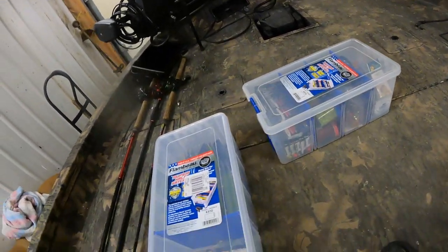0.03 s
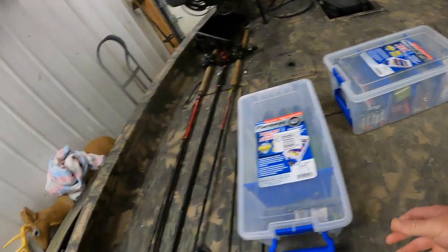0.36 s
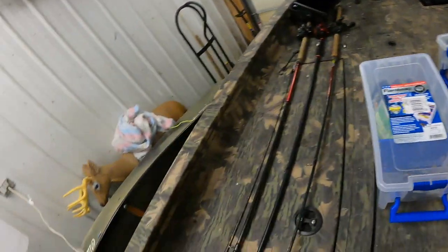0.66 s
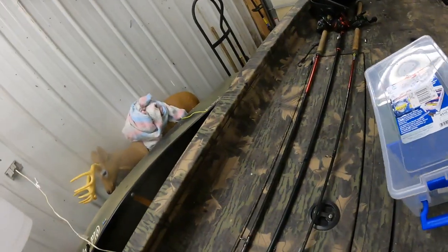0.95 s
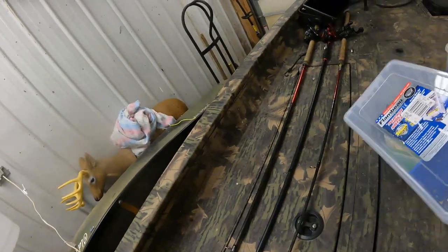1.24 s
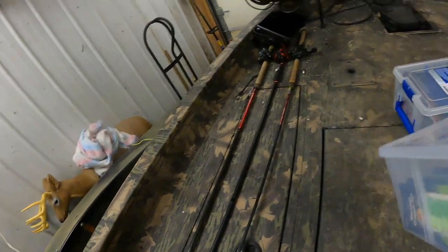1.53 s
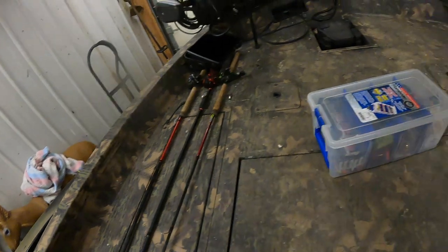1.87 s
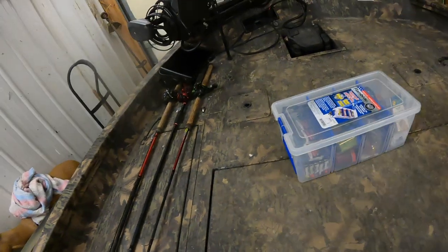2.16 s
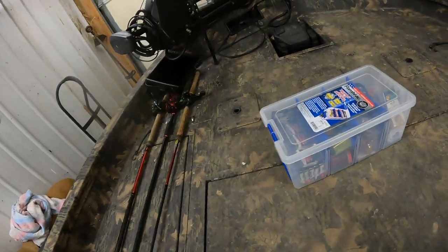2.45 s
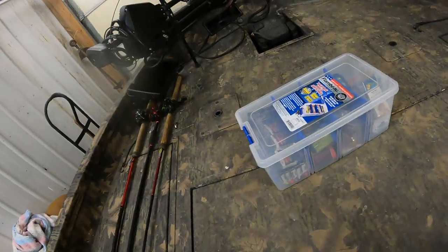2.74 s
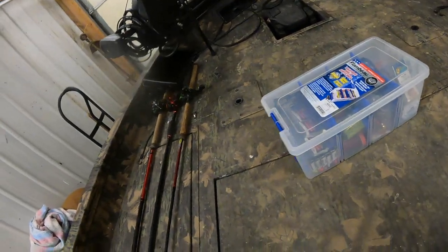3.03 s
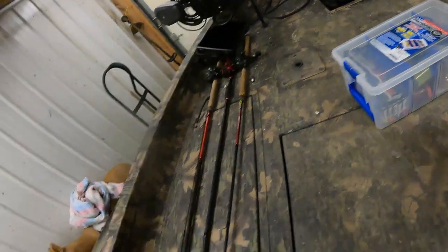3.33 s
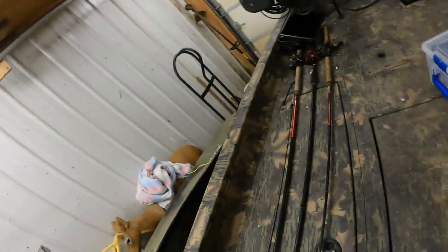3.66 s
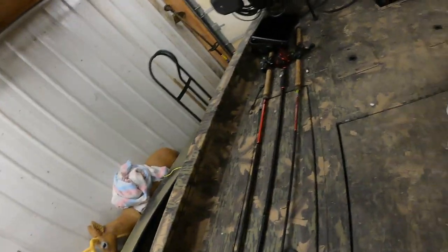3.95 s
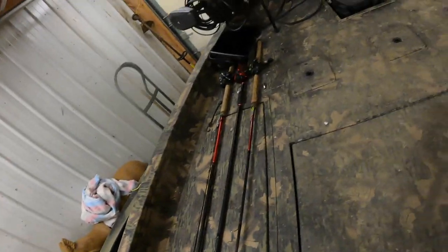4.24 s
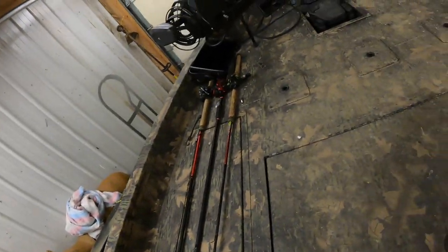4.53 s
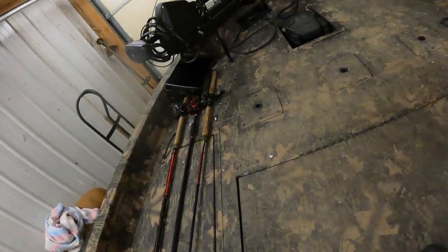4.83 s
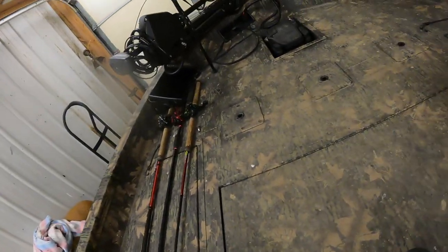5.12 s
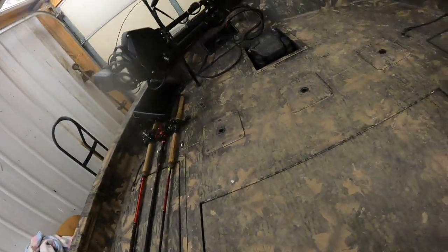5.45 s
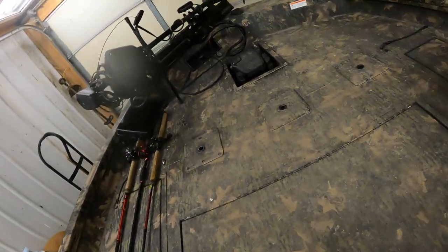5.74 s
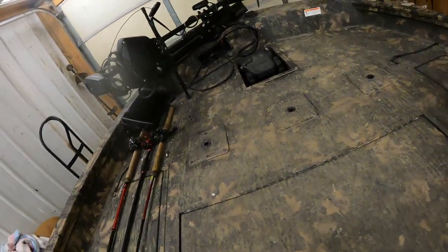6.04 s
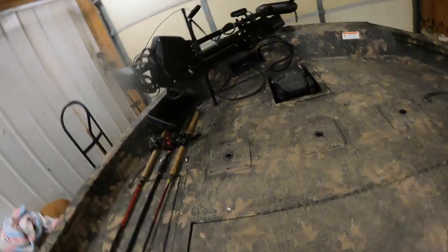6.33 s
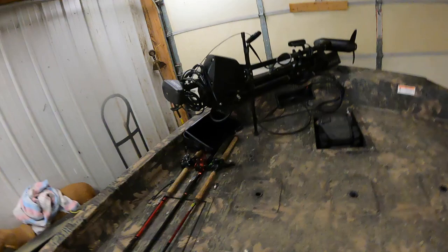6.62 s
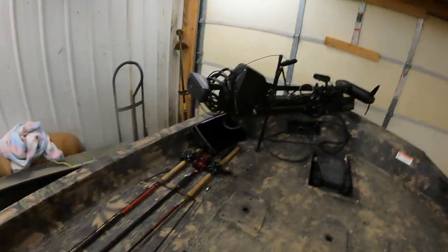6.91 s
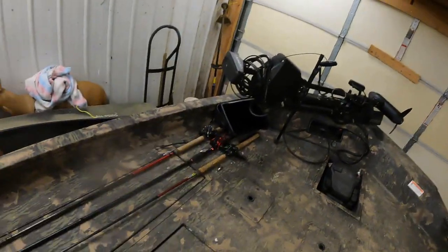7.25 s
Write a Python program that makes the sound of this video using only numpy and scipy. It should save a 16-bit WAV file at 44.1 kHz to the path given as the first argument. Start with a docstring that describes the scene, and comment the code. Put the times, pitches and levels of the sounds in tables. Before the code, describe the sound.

A plastic tackle box lands with a hollow thud on a carpeted boat deck in a garage. Handles snap, a box judders as it is pulled free, and another thud shakes the lures inside. A box is then dragged over the carpet with several knocks, followed by three more rattling thuds. Near the end come dull bumps, small creaks and sleeve rustle close to the microphone. The walls add a short echo.

```python
"""A plastic tackle box lands with a hollow thud on a carpeted boat deck in a garage. Boxes are set down,
lifted and dragged: each knock thuds in the deck, rings the box and shakes the lures inside, and the
walls throw it back. Handles snap; box bottoms judder and scrape over the carpet. Sleeves rustle near
the stereo microphone, and towards the end come small pops, dull hollow bumps and creaks close by."""
import sys
import numpy as np
from scipy import signal
from scipy.fft import rfft, irfft, next_fast_len
from scipy.io import wavfile

SR = 44100
rng = np.random.default_rng(int(sys.argv[2]) if len(sys.argv) > 2 else 0)


def transcribe(u):
    """Save the signal u as a 16-bit wav file named by the first command-line argument.

    u: samples, shape (n,) or (channels, n), limited to [-1, 1]; the rate is SR.
    q: integer samples, one column per channel.
    """
    v = np.clip(np.atleast_2d(u).T, -1, 1)
    q = np.round(v * 32767).astype(np.int16)
    wavfile.write(sys.argv[1], SR, q)


N = 329864
TIME = np.arange(N) / SR

# modes of a box standing on the deck: (frequency [Hz], level [dB], base t60 [s])
BOX_MODES = [(49.5, -15.5, 0.37), (81, -6, 0.25), (135.15, -2.5, 0.41), (161.7, -0.5, 0.33),
             (211, -6.5, 0.28), (246, 6, 0.12), (294.4, -2.5, 0.15), (388.1, -0.5, 0.13), (484, -16, 0.4),
             (604, -7, 0.029), (709.5, -5.5, 0.068), (745, -7.5, 0.08), (952, -6, 0.12), (1040, -18, 0.12),
             (1220, -9.5, 0.1), (1700, -21, 0.03), (2790, -24, 0.1), (3340, -36, 0.15), (3770, -35, 0.068)]
# thud, body, clack and tick bands: (low edge [Hz], high edge [Hz], base t60 of dense ring [s], weight [dB])
BANDS = [(33.2, 110.7, 0.078, 2), (184, 491, 0.046, 1), (462, 1790, 0.1, -6), (2470, 43000, 0.21, -1)]


def landings():
    """A box bottom booms on the deck, its lid slaps a moment later, and walls and deck ring on."""
    # (time [s], force [dB], thud [dB], tick [dB], lid delay [s], lure rattle [dB], boom [dB],
    #  boom note [Hz], lid note [Hz], wall hum [dB], hum note [Hz])
    drops = [(0.001, -4.5, -21.5, -31.5, 0.012, -17, -15.5, 265, 1100, -24, 383),
             (2.441, -3.5, -23.5, -29.5, 0.0077, -2.5, -17, 191, 840, -28, 244),
             (2.537, -5.5, -24.5, -31, 0.0068, -25, -12.5, 250.5, 1030, -19, 249),
             (5.198, -2.5, -29, -23, 0.0052, -2, -7.5, 258, 1070, -21, 388),
             (5.37, -5, -25.5, -29, .005, -2, -13, 201, 1110, -29, 388),
             (5.514, -7.5, -24.5, -30, 0.0045, -14, -11, 239, 1140, -28, 236)]
    # the deck sways under a settled box: (time [s], note [Hz], level [dB])
    sways = [(0.164, 63, -33), (2.648, 69.6, -25), (5.576, 80, -27), (5.98, 80, -38)]
    out = np.zeros((2, N))
    for s, force, thud, tick, lid_s, rattle_db, boom_db, boom_hz, lid_hz, hum_db, hum_hz in drops:
        bottom = (thud, force - 12.5, force - 11, tick)
        lid = (thud + 5.5, force - 18, force - 12, tick - 2)
        add(out, s, box_strike(bottom, wall_hz=670, rattle_db=rattle_db))
        add(out, s, boom(boom_hz, boom_db, rise_s=0.0095))
        add(out, s + lid_s, box_strike(lid, lid_hz, rattle_db))
        add(out, s + lid_s, wall_hum(hum_hz, hum_db))
    for s, hz, db in sways:
        add(out, s, boom(hz, db, rise_s=0.039))
    return out


def knocks():
    """Boxes rock and bump on one edge with single blows, some hard and some dull."""
    # (time [s], clack [dB], deck thud [dB], box body [dB], tick [dB], wall note [Hz], bottom note [Hz])
    bumps = [(0.029, -19, -21, -17, -54, 720, 64.5), (0.047, -25, -23, -23.5, -36.5, 720, 115),
             (0.072, -23, -29, -14, -40, 740, 240), (0.096, -25, -26, -24, -41, 1050, 260),
             (0.142, -28.5, -23.5, -36, -41.5, 990, 180), (0.807, -37, -38, -41, -50.5, 1050, 174),
             (1.326, -30, -40, -20, -38.5, 680, 200), (1.354, -34, -41, -21, -47, 1050, 185),
             (2.602, -22.5, -18.5, -22, -43, 1070, 258), (2.627, -26, -21.5, -21.5, -36, 600, 249),
             (2.766, -35, -25, -34.5, -48, 1610, 294), (2.832, -25.5, -31, -26, -41, 1620, 256),
             (2.987, -39, -29, -27.5, -49, 990, 171), (3.018, -42, -38.5, -37, -51, 710, 240),
             (3.823, -44, -27, -28, -51, 710, 131), (3.904, -15.5, -20, -16, -33, 775, 187),
             (4.089, -29, -15.5, -22.5, -42, 890, 140), (4.15, -12.5, -32, -23, -48, 1140, 253),
             (4.207, -17, -16, -15.5, -46, 580, 255), (4.322, -17, -17.5, -18.5, -46, 715, 204),
             (4.388, -20.5, -24.5, -31, -37, 1350, 283), (4.405, -24, -26, -29, -55, 860, 265),
             (4.547, -24, -41, -23.5, -44, 1000, 342), (4.731, -23, -48, -28.5, -37.5, 653, 150),
             (5.243, -29, -36, -25, -47, 1250, 280), (5.277, -26, -40, -25.5, -50, 930, 168),
             (5.425, -20, -36, -22, -36, 1140, 181), (5.447, -20.5, -55, -29, -47, 730, 365),
             (5.712, -35.5, -34, -34.5, -60, 735, 133), (5.76, -38.5, -33, -35, -55, 590, 165),
             (5.827, -40, -38.5, -43, -52, 600, 140), (5.878, -33, -44, -37, -53, 640, 213),
             (5.89, -27, -29.5, -32, -42.5, 1400, 229), (5.935, -31.5, -29.5, -29.5, -39.5, 1800, 201)]
    out = np.zeros((2, N))
    for s, clack, thud, body, tick, wall_hz, bottom_hz in bumps:
        add(out, s, box_strike((thud, body - 3.5, clack, tick), wall_hz, rattle_db=-27.5))
        add(out, s, boom(bottom_hz, body + 1.5, rise_s=0.0084))
    return out


def box_strike(levels_db, wall_hz, rattle_db):
    """One blow on a box, almost centred on the microphone; the struck wall adds its own hollow note."""
    modes = list(BOX_MODES) + [(wall_hz, 1.5, 0.035)]
    sound = blow(modes, levels_db, hold=0.99, rattle_db=rattle_db,
                 dense_db=(0.5, 2.1, 7.2, 9.5), crack_db=3, detune=0.017)
    return amp(0.5) * sound * pan(-0.7)


def blow(modes, levels_db, hold, rattle_db, dense_db, crack_db, detune):
    """Clear modes over a crack, a dense ring and a trailing rattle, levelled per band."""
    # spectrum of ringing plastic: (frequency [Hz], level [dB])
    plastic = [(18, -88), (30, 7.5), (65, 1), (180, -14), (240, -12.5), (337, -19.5), (384, -8.5),
               (426, -28.5), (538, -18.5), (837, -28), (1030, -20), (1370, -25.5), (6200, -39),
               (11900, -62.5), (15000, -78)]
    t = np.arange(SR // 2) / SR
    clear = ring(modes, t, detune, hold)
    hiss = colour(stereo_noise(len(t)), plastic)
    crack = amp(crack_db) * np.exp(-t / 0.0007)
    rattle = amp(rattle_db) * unit(amp(2.2 * wander(len(t), 464))) * np.exp(-t / 0.057)
    contact = 1 - np.exp(-t / 0.00012)
    burst_gain = np.sqrt(0.013 / t[-1])  # the energy of a 13 ms burst at unit rms
    out = np.zeros((2, len(t)))
    for (lo, hi, t60, weight_db), db, share_db in zip(BANDS, levels_db, dense_db):
        envelope = crack + decay(t, t60 * hold) + rattle
        dense = amp(share_db) * unit(band(hiss * envelope * contact, lo, hi))
        out += amp(db + weight_db) * burst_gain * unit(unit(band(clear, lo, hi)) + dense)
    return out * np.minimum(1, (t[-1] - t) * 10)


def boom(hz, db, rise_s, sharpness=4.54):
    """One hollow note that swells for a moment and dies within a few cycles."""
    t = np.arange(SR // 4) / SR
    swell = (t / rise_s * np.exp(1 - t / rise_s)) ** sharpness
    return amp(db) * np.sqrt(2) * swell * np.sin(2 * np.pi * hz * t)


def wall_hum(hz, db, beat_hz=14, rise_s=0.019):
    """Two facing box walls take up the blow and ring on, slightly out of tune."""
    t = np.arange(SR // 2) / SR
    walls = np.sin(2 * np.pi * hz * t) + 0.5 * np.sin(2 * np.pi * ((hz + beat_hz) * t + rng.random()))
    return amp(db + 4) * walls * (1 - np.exp(-t / rise_s)) * decay(t, t60=0.28)


def snaps():
    """Handles and latches hit with a dry crack and a very short ping, and rebound once."""
    # (time [s], clack [dB], tick [dB], ping [dB], ping note [Hz], left minus right [dB])
    hits = [(0.447, -39, -61, -26, 960, 2), (0.6588, -34.5, -39.5, -19, 1250, 3.5),
            (1.076, -26.5, -45.5, -25, 2390, -2), (1.1, -27.5, -42, -32, 1050, -1),
            (1.16, -22.5, -27.5, -16, 3940, -2), (1.183, -19.5, -30.5, -14, 3880, 1.5),
            (1.778, -35, -52, -37, 2170, -1), (1.978, -34, -62, -31, 1300, 0),
            (3.003, -41, -38, -44, 930, 1), (3.396, -32, -55, -42, 1230, 3),
            (4.163, -9.5, -28, -19, 1300, 0), (4.243, -17, -26, -24, 1100, 1.5),
            (5.567, -16.5, -30.5, -5.5, 2380, -2), (5.932, -36, -34.5, -29, 1990, 4),
            (5.975, -27.5, -42, -18, 690, 0), (7.417, -41.5, -47, -29, 3700, 19)]
    # modes of a handle: (frequency [Hz], level [dB], base t60 [s])
    handle_modes = [(315, 9, 0.018), (680, 3, 0.016), (1090, 1, 0.0072), (1680, 6, 0.007),
                    (2470, 1.5, 0.022), (3700, 3, 0.011), (4800, 26, 0.013), (6200, -8, 0.005)]
    out = np.zeros((2, N))
    t = np.arange(SR // 2) / SR
    for s, clack, tick, ping_db, ping_hz, pan_db in hits:
        for delay_s, db in ((0, 0), (0.0027, -5)):  # hit, rebound
            crack = blow(handle_modes, (clack - 15, clack - 6, clack, tick), hold=0.77, rattle_db=-27,
                         dense_db=(2.7, 0.74, 8.2, 15), crack_db=12, detune=0.15)
            ping = ring([(ping_hz, ping_db, 0.007)], t, detune=0.03)
            add(out, s + delay_s, amp(db) * (crack + ping) * pan(pan_db))
    return amp(-3.5) * out


def drag(snags_per_s=310, coast_s=0.039):
    """Carpet fibres catch and release a dragged box; grit crunches, and rim snags shake the walls."""
    # the pull on the box: (time [s], effort [dB])
    pull = [(3.8, -74), (3.824, -39), (3.89, -28.5), (3.92, -32), (3.94, -25), (4.07, -25.5), (4.17, -27),
            (4.19, -31), (4.3, -33.5), (4.36, -38.5)]
    # rumble, body, scrape, fizz: (level at full effort [dB], growth with effort [dB/dB], lurch [share])
    layers = [(-16.5, 1.4, 0.94), (-20, 0.44, 0.9), (-20, 0.72, 0.33), (-18.5, 1.92, 0.073)]
    # spectra of rubbed carpet and crunching grit: (frequency [Hz], level [dB])
    carpet = [(18, -35), (30, -26), (59, -2), (102, -11), (140, 10.5), (182, -5), (243, -2.5), (324, -3),
              (410, -15.5), (467, -14.5), (808, -19), (1400, -24.5), (4910, -38.5), (11900, -53),
              (15500, -74)]
    grit = [(250, -35), (600, 7), (1100, 0.5), (2000, -14), (4500, -5), (8000, -18), (12000, -27),
            (15000, -47)]
    grains = stereo_noise(N) * amp(3.2 * wander(N, 900) + 1.2 * wander(N, 70))
    rub = colour(deck_bounce(grains, start_s=pull[0][0]), carpet)
    snags = (rng.random(N) < snags_per_s / SR) * rng.uniform(-1.08, 1, N)
    walls = ring(BOX_MODES, np.arange(SR // 4) / SR, detune=0.017)
    box = excite(unit(snags) + 0.5 * unit(grains), walls)
    effort = gain_curve(pull, coast_s) / amp(-21)  # -21 dB is full effort
    crunch = unit(colour(clicks(per_s=140, spread_db=1.5, ring_s=0.0048), grit))
    out = amp(-25) * crunch * effort
    lurch_db = 1.5 * wander(N, 55)
    ringing_db = (-3.5, -2.5, -4.5, -12)
    for (lo, hi, _, _), (db, growth, lurching), ring_db in zip(BANDS, layers, ringing_db):
        part = unit(band(rub, lo, hi)) + amp(ring_db) * unit(band(box, lo, hi))
        out += unit(part * amp(lurching * lurch_db)) * amp(db) * effort ** growth
    return out * pan(-0.8)


def deck_bounce(x, start_s, share=0.44):
    """The microphone hears a moving box with its reflection off the deck: a comb that slides down."""
    delay_s = np.maximum(0.001593 + 0.00197 * (TIME - start_s), 0)
    return x + share * np.array([np.interp(TIME - delay_s, TIME, channel) for channel in x])


def judder(rise_s=0.0059, fall_s=0.008, sag_hz_per_s=70, overtone_ratio=1.7):
    """A box is pulled free: stick-slip pulses ring its walls over a hollow, slightly falling groan."""
    # (time [s], length [s], slip rate [Hz], groan [dB], overtone against groan [dB], chatter [dB])
    pulls = [(0.835, 0.077, 144, -41, -13, -58), (0.898, 0.025, 126, -33.5, -3, -44.5),
             (0.936, 0.022, 144, -20.5, -5.5, -39.5), (0.985, 0.087, 139, -24, -4, -38),
             (1.085, 0.029, 134, -16.5, -12, -41), (1.134, 0.026, 150, -24.5, -5.5, -40),
             (1.29, 0.037, 164, -25, -1, -32.5), (1.32, 0.049, 132, -25, -0.5, -27)]
    out = np.zeros((2, N))
    size = SR // 4
    t = np.arange(size) / SR
    for s, length, slip_hz, groan_db, overtone_db, chatter_db in pulls:
        pull = np.minimum(t / rise_s, 1) * np.exp(-np.maximum(t - length, 0) / fall_s)
        rate_hz = (slip_hz - sag_hz_per_s * t) * np.exp(0.045 * wander(size, 140))
        turns = np.cumsum(rate_hz) / SR
        overtone_gain = amp(overtone_db + 2.5 * wander(size, 120))  # second mode of the flexing bottom
        overtone = overtone_gain * np.sin(2 * np.pi * (overtone_ratio * turns + 0.25 * wander(size, 70)))
        fundamental = np.sin(2 * np.pi * turns) * amp(1.8 * wander(size, 110))
        groan = np.sqrt(2) * (fundamental + overtone)
        slips = np.diff(np.floor(turns), prepend=0) * amp(4 * wander(size, 140))
        walls = band(stereo_noise(size) * np.exp(-t / 0.0076), 338, 940)
        rasp = 0.04 * rng.standard_normal(size)
        chatter = unit(excite(slips + rasp, walls))
        add(out, s, pull * (amp(groan_db) * groan + amp(chatter_db) * chatter))
    return out


def scuff(start_s=4.545, fade_s=0.053):
    """The rim of a tipping box skips over the deck and stirs its walls, dying away."""
    t = np.arange(SR // 4) / SR
    skips = stereo_noise(len(t)) * amp(6.2 * wander(len(t), 161))
    walls = excite(skips, ring(BOX_MODES, t, detune=0.01))
    scrape = unit(band(unit(skips) + amp(-12) * unit(walls), 366, 1100, order=4))
    out = np.zeros((2, N))
    add(out, start_s, amp(-22.5) * scrape * np.exp(-t / fade_s) * np.sqrt(1 - t / t[-1]))
    return out


def lure_rattles():
    """Hard lures tumble against each other and the box walls in short flurries."""
    # (peak time [s], length [s], level [dB])
    flurries = [(1.229, 0.03, -38), (2.629, 0.059, -34.5), (4.585, 0.022, -41), (5.59, 0.13, -41.5)]
    # spectrum of the clatter: (frequency [Hz], level [dB])
    lures = [(700, -15), (1500, 2.5), (2900, -2.5), (4800, -6.5), (7000, -19), (12000, -44), (15000, -51)]
    clatter = unit(colour(clicks(per_s=990, spread_db=4, ring_s=0.0016), lures))
    return clatter * sum(amp(db) * np.exp(-(2 * (TIME - s) / length) ** 2) for s, length, db in flurries)


def bumps_and_pops():
    """Dull hollow bumps and small pops close to the microphone, each with its own note."""
    # (time [s], clack [dB], thud [dB], body [dB], ringing note [Hz], boom note [Hz])
    bumps = [(3.513, -52, -37.5, -47, 454, 183), (3.535, -38, -40, -38, 413, 163),
             (3.684, -32.5, -44, -43, 632, 150), (3.755, -53, -44, -42, 353, 154),
             (4.939, -38, -72, -54, 600, 138), (5.101, -33.5, -68, -49, 678, 140),
             (6.192, -46, -61, -50, 707, 135), (6.214, -26.5, -65, -33.5, 332, 139),
             (6.613, -38, -36.5, -58, 557, 124), (6.653, -46, -34, -43, 500, 129),
             (6.675, -57, -36, -56, 410, 134), (6.821, -64, -33.5, -64, 400, 96),
             (6.868, -41, -28, -35, 410, 119), (6.941, -61, -28.5, -41.5, 416, 112),
             (7.195, -42, -24.5, -27, 433, 221), (7.22, -50, -24.5, -32, 425, 96),
             (7.243, -56, -27.5, -37, 412, 57.3), (7.314, -46, -63, -41, 360, 140)]
    # hollow modes common to them all: (frequency [Hz], level [dB], t60 [s])
    hollow_modes = [(59.4, 19, 0.19), (120, -28, 0.14), (270, 4.5, 0.071), (373, 8, 0.07), (531, 0, 0.096),
                    (654, 12, 0.0061)]
    out = np.zeros((2, N))
    for s, clack, thud, body, note_hz, boom_hz in bumps:
        modes = list(hollow_modes) + [(note_hz, 3, 0.11)]
        add(out, s, blow(modes, (thud - 4, body, clack, clack - 24), hold=1, rattle_db=-30,
                         dense_db=(0, 1.5, -8, 0), crack_db=-8, detune=0.015))
        add(out, s, boom(boom_hz, thud + 0.5, rise_s=0.0084))
    return amp(-0.5) * out


def creaks():
    """Short, slightly rough squeaks close to the microphone."""
    # (time [s], length [s], pitch [Hz], level [dB])
    squeaks = [(1.929, 0.017, 600, -36), (1.946, 0.03, 590, -35.5), (6.915, 0.04, 820, -41),
               (7.197, 0.066, 429.3, -35), (7.243, 0.052, 2400, -47)]
    out = np.zeros((2, N))
    for s, length, hz, db in squeaks:
        size = int(length * SR)
        progress = np.linspace(0, 1, size)
        turns = np.cumsum(hz * (1 + 0.025 * wander(size, 315))) / SR
        rasp = unit(band(rng.standard_normal(size), 0.7 * hz, 1.4 * hz, order=2))
        squeak = np.sin(2 * np.pi * turns) + 0.5 * rasp
        envelope = np.sqrt(progress) * (1 - progress) * amp(2 * wander(size, 280))
        add(out, s, amp(db) * unit(squeak * envelope))
    return out


def sleeves(stop_speedup=1.19):
    """Cloth brushes past just left of the microphone: a grainy rustle over a soft shuffle."""
    # (peak time [s], length [s], rustle [dB], shuffle [dB], left minus right [dB])
    brushes = [(0.566, 0.16, -57, -50, 1.5), (0.809, 0.082, -67, -38.5, 5), (1.49, 0.084, -70, -54, 4),
               (1.76, 0.3, -55, -53, 2.5), (3.545, 0.22, -51, -44.5, 2.5), (3.764, 0.079, -78, -38, 3),
               (6.37, 0.2, -68.5, -45, 2), (6.647, 0.21, -49.5, -42.5, 6), (6.982, 0.087, -58, -54, 7.5),
               (7.165, 0.091, -46.5, -41, 9), (7.392, 0.19, -52.5, -49, 7.5)]
    # spectrum of the rustle: (frequency [Hz], level [dB])
    cloth = [(180, -62), (300, -29), (404, 0), (535, -12), (571, -6), (863, -9.5), (922, -7), (2790, -13),
             (4650, -11), (11000, -30), (12100, -30), (15500, -47)]
    folds = amp(2 * wander(N, 500) + 1.5 * wander(N, 35))
    rustle = amp(7) * unit(colour(stereo_noise(N) * folds, cloth))
    shuffle = amp(-3) * unit(band(stereo_noise(N), 65, 315, order=2) * amp(3 * wander(N, 30)))
    out = np.zeros((2, N))
    for s, length, rustle_db, shuffle_db, pan_db in brushes:
        from_peak = 2 * (TIME - s) / length * np.where(TIME > s, stop_speedup, 1)
        swell = amp(-2 * from_peak ** 2)
        out += swell * (rustle * amp(rustle_db) * pan(pan_db) + shuffle * amp(shuffle_db))
    return out


def garage_echo(x):
    """Bare walls return a diffuse tail, the deep bass dying last."""
    # reverberation of the garage: (frequency [Hz], t60 [s])
    ring_times = [(50, 1), (160, 0.26), (420, 0.54), (1100, 0.47), (2900, 0.55), (7700, 0.5), (14000, 0.17)]
    # spectrum of the echo: (frequency [Hz], level [dB])
    echo = [(40, -2.5), (130, -6), (250, -0.5), (500, -0.5), (1200, -2), (3000, -0.5), (7000, -3.5),
            (14000, -4.5)]
    hz, t, spectra = signal.stft(stereo_noise(SR), SR, nperseg=512)
    t60 = read(ring_times, hz)[:, None]
    equal_energy = np.sqrt(2 * np.log(1000) / (t60 * SR))
    spectra *= decay(t, t60) * amp(read(echo, hz))[:, None] * equal_energy
    onset = np.clip((TIME[:SR] - 0.006) / 0.009, 0, 1)
    tail = signal.istft(spectra, SR, nperseg=512)[1][:, :SR] * onset
    return excite(x.mean(0), tail)


def room_tone():
    """The still air of the garage: a faint, steady, low hush."""
    # (frequency [Hz], level [dB])
    air = [(15, -25), (25, -4), (75, -9), (156, 7), (895, -3.5), (1170, -7.5), (2010, -6), (2770, -11),
           (4870, -13), (8130, -19), (12200, -27), (15500, -48)]
    return amp(-54) * unit(colour(stereo_noise(N), air))


def stereo_noise(size):
    """Noise at two close microphone capsules: shared in the bass, looser in the treble."""
    # stereo width: (frequency [Hz], side minus mid [dB])
    width = [(60, -54), (110, -21.5), (200, -16), (380, -16.5), (700, -11), (1290, -10), (2380, -5),
             (4400, -8), (8120, -7), (15000, -5)]
    mid, side = rng.standard_normal((2, size))
    side = colour(side, width)
    return np.array([mid + side, mid - side])


def ring(modes, t, detune, hold=1):
    """Dying modes, shifted a little by where the blow lands; hold scales their ring time."""
    hz, db, t60 = np.transpose(modes)[:, :, None]
    hz = hz * (1 + detune * rng.standard_normal(hz.shape))
    sign = (-1) ** np.arange(len(hz))[:, None]
    return (sign * amp(db) * decay(t, t60 * hold) * np.sin(2 * np.pi * hz * t)).sum(0)


def clicks(per_s, spread_db, ring_s):
    """A stream of tiny hard contacts of uneven size."""
    sizes = amp(spread_db * np.minimum(rng.exponential(1, N), 3))
    contacts = sizes * (rng.random(N) < per_s / SR)
    return signal.lfilter([1], [1, -np.exp(-1 / (ring_s * SR))], contacts) * stereo_noise(N)


def excite(drive, response):
    """Convolves a drive with an impulse response, keeping the drive's length."""
    return signal.oaconvolve(np.atleast_2d(drive), np.atleast_2d(response), axes=1)[:, :drive.shape[-1]]


def wander(size, per_s):
    """A random curve of about unit spread."""
    at = np.arange(size) * per_s / SR
    return np.interp(at, np.arange(N // 8), rng.standard_normal(N // 8))


def gain_curve(points, fade_s):
    """(time [s], level [dB]) points as a gain: silent before their span, dying away after it."""
    s, db = np.transpose(points)
    after = np.maximum(TIME - s[-1], 0)
    return amp(np.interp(TIME, s, db)) * (TIME >= s[0]) * np.exp(-np.minimum(after / fade_s, 20))


def colour(x, points):
    """Gives a sound a smooth spectrum."""
    size = x.shape[-1]
    padded = next_fast_len(size)
    gain = amp(read(points, np.fft.rfftfreq(padded, 1 / SR)))
    return irfft(rfft(x, padded) * gain, padded)[..., :size]


def read(points, hz):
    """Reads a table along a log-frequency axis."""
    f, value = np.transpose(points)
    return np.interp(np.log(hz + 1), np.log(f + 1), value)


def band(x, lo_hz, hi_hz, order=3):
    """Causal band-pass."""
    sos = signal.butter(order, [lo_hz, min(hi_hz, 0.49 * SR)], "band", fs=SR, output="sos")
    return signal.sosfilt(sos, x)


def add(mix, s, sound):
    """Mixes a sound in at a given time."""
    part = mix[:, max(round(s * SR), 0):][:, :sound.shape[-1]]
    part += sound[..., :part.shape[1]]


def decay(t, t60):
    """Falls by 60 dB in t60 seconds."""
    return np.exp(-np.log(1000) * t / t60)


def pan(db):
    """Channel gains for a left-minus-right level."""
    return amp(np.vstack([db / 2, -db / 2]))


def amp(db):
    """Decibels to gain."""
    return 10 ** (np.asarray(db) / 20)


def unit(x):
    """Scales to an rms of one."""
    return x / np.sqrt(np.mean(x ** 2) + 1e-20)


def scene():
    """Boxes out on the deck; bumps, creaks and sleeves close to the microphone; the garage all around."""
    # where bumps and creaks come from: (time [s], left minus right [dB])
    bearing = [(6.2, 0), (6.6, -7), (6.95, -7), (7.19, 3)]
    boxes = landings() + knocks() + lure_rattles()
    handles = snaps()
    rubbing = drag() + scuff() + judder()
    sides = pan(np.interp(TIME, *np.transpose(bearing)))
    bumps, squeaks = bumps_and_pops() * sides, creaks() * sides
    air = room_tone()
    to_walls = amp(-4) * (boxes + bumps) + amp(-3.5) * handles + amp(-2.5) * rubbing + amp(-10) * squeaks
    return boxes + handles + rubbing + bumps + squeaks + garage_echo(to_walls) + sleeves() + air


def record(dry):
    """The microphone's two capsules each colour the sound a little; the treble ends at 15.2 kHz."""
    # capsule balance: (frequency [Hz], left minus right [dB])
    balance = [(60, -0.2), (110, -0.4), (200, -0.6), (380, -0.5), (700, -1.2), (1290, -0.7), (2600, -2.4),
               (4400, -2.4), (8120, 2), (15000, 0)]
    left = colour(dry[0], [(hz, db / 2) for hz, db in balance])
    right = colour(dry[1], [(hz, -db / 2) for hz, db in balance])
    low_pass = signal.firwin(511, 15200, window=("kaiser", 9), fs=SR)
    return signal.oaconvolve(np.array([left, right]), low_pass[None], "same", axes=1)


dry = scene()
out = record(dry)
transcribe(out)
```